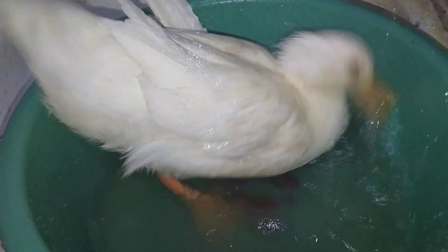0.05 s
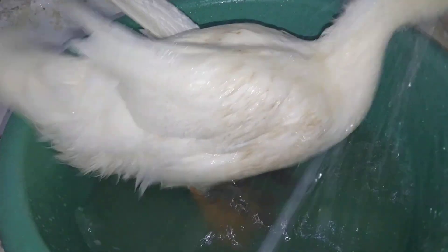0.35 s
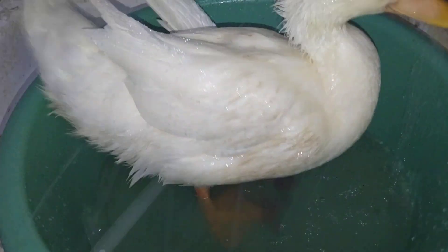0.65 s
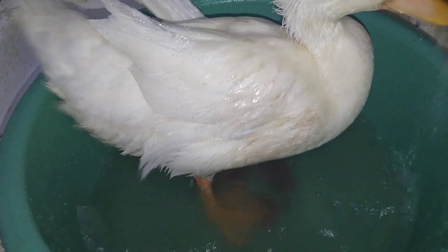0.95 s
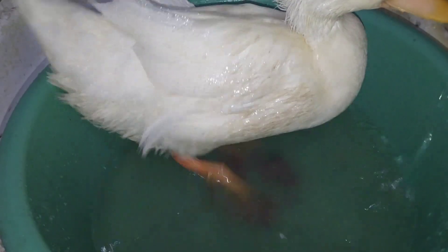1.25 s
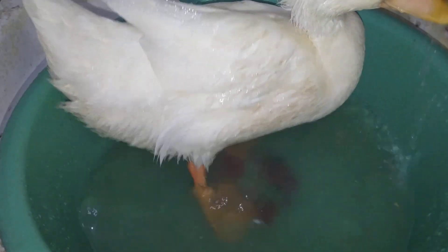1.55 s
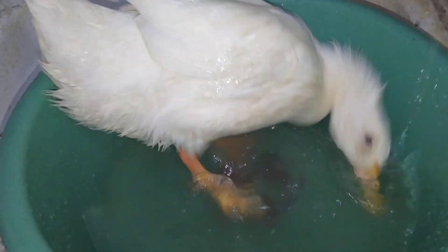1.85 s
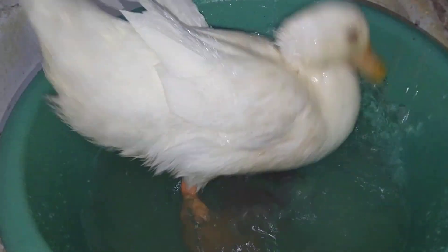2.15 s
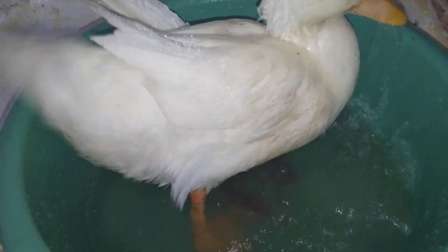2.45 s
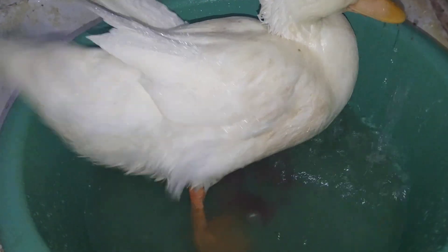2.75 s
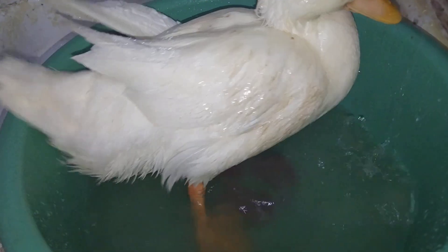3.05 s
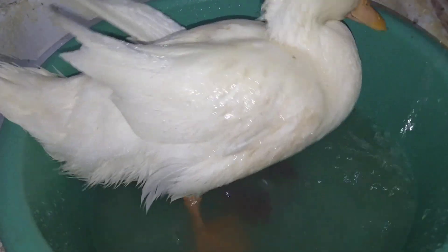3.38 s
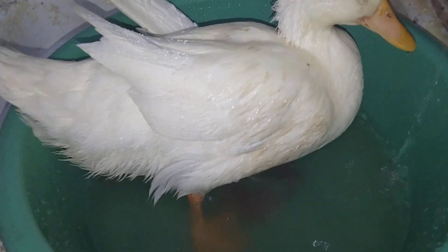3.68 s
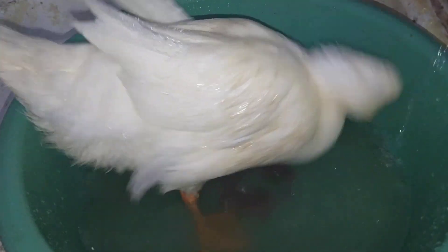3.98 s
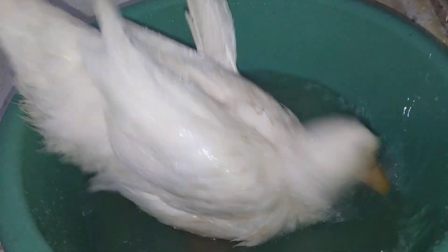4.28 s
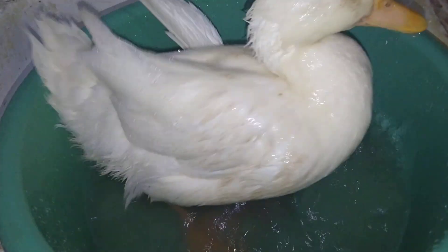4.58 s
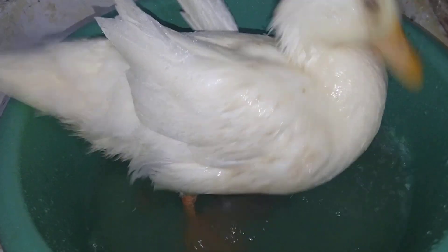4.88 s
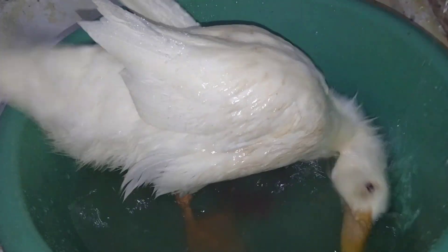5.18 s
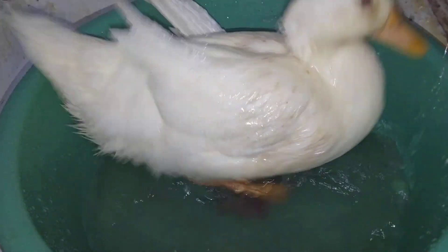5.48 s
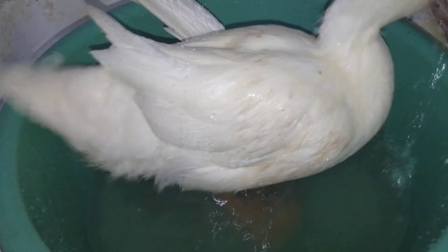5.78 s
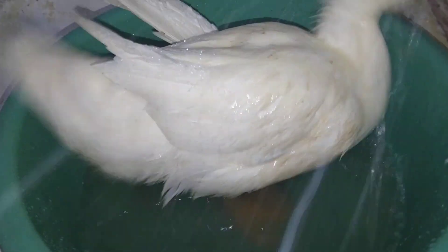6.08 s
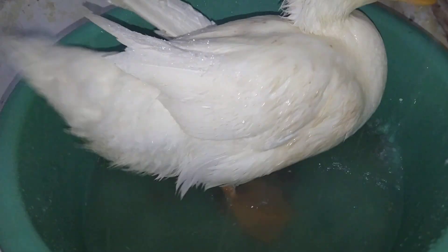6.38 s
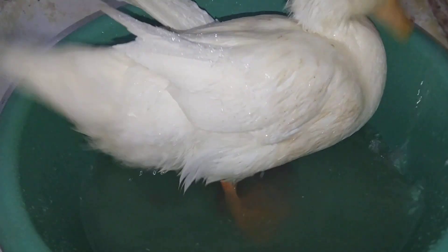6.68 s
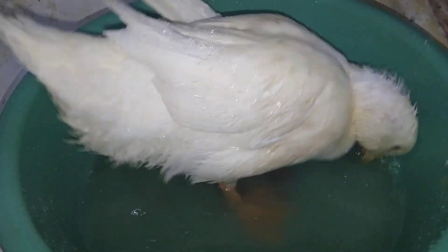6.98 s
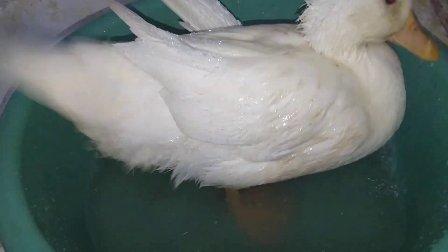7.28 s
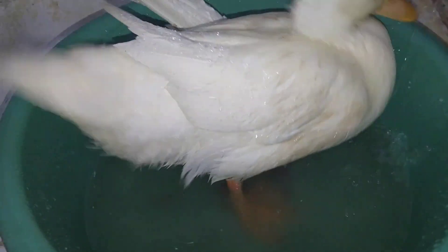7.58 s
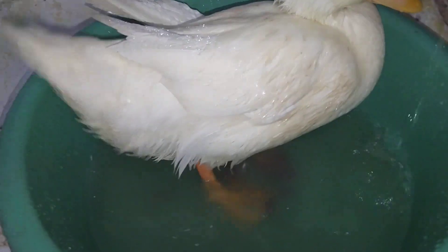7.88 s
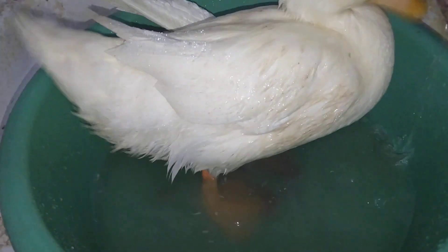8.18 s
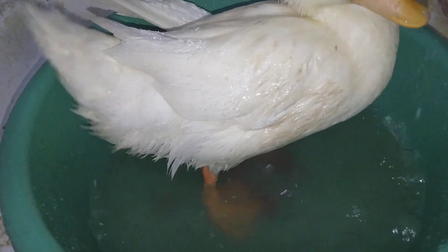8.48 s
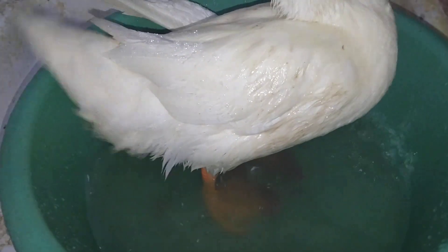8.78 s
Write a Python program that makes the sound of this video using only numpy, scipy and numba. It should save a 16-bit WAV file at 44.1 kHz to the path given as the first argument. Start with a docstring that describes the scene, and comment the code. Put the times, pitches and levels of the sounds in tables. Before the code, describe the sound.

A duck splashes about in a plastic tub, bumping its sides as an uneven stream of water slaps and bubbles.

```python
"""A stream of water falls into a plastic tub where a duck is bathing, close by in a small hard-walled room.
The stream breaks into lumps that slap and spatter; trapped air rings as bubbles and the falling water
drums on the tub. The duck steps, dips its bill and bumps the tub: sloshes, hollow gulps and knocks.
Under it all lie a low rumble and the faint hum of a far motor."""
import sys
import numpy as np
from scipy import signal
from scipy.fft import rfft, irfft
from scipy.io import wavfile
from scipy.ndimage import uniform_filter1d
from numba import njit

SR = 44100
rng = np.random.default_rng(int(sys.argv[2]) if len(sys.argv) > 2 else 0)


def store_wav(level_fs):
    """Save 16-bit WAV to argv[1]."""
    pcm = np.round(np.clip(np.atleast_2d(level_fs), -1, 1) * 32767)
    wavfile.write(sys.argv[1], SR, pcm.T.astype(np.int16))


N = 389844
TIME = np.arange(N) / SR
PORT_LAG_S = .00017  # the water lands nearer the right microphone port

# lumps of water landing: (time [s], crack [dB], splat [dB], scattered drops [dB])
LUMPS = [(0.074, -22, -20.5, -19), (0.1066, -21, -32, -26), (0.201, -10, -15, -14), (0.336, -3, -23, -37),
         (0.3725, -9.5, -22.5, -37), (0.48, -9, -20, -18.5), (0.694, -14.5, -48, -31),
         (0.7776, -8, -32, -21.5), (0.85, -6, -22.5, -21), (0.8884, -9, -18.5, -35),
         (0.9816, -9, -24, -15.5), (1.01, -5, -24, -34), (1.0238, -20, -15, -36), (1.1248, -12, -21, -40),
         (1.3568, -5.5, -18, -36), (1.372, -6.5, -32, -37), (1.4549, -14, -19.5, -42),
         (1.524, -10.5, -22, -17), (1.558, -17, -16.5, -33), (1.608, -10, -31, -19), (1.6288, -9, -22, -28),
         (1.653, -11, -25, -23), (1.669, -19, -18.5, -30), (1.752, -5.5, -28, -19), (1.773, -22, -20, -28),
         (1.82, -11, -22, -12.5), (1.87, -13, -18, -23), (1.887, -12, -33, -25), (1.904, -12, -24, -20),
         (1.9813, -2, -19, -19), (2.037, -8.5, -28, -32), (2.1117, -10.5, -16.5, -42), (2.24, -4, -16, -21),
         (2.2567, -24, -32, -32), (2.296, -10, -16, -39), (2.445, -11, -19, -34), (2.464, -20, -10.5, -39),
         (2.6407, -14, -40, -24.5), (2.719, -11, -22.5, -34), (2.815, -6, -26, -30),
         (2.862, -3, -17.5, -31), (2.9428, -10.5, -23.5, -20), (2.9845, -4.5, -13, -29),
         (2.996, -10, -32, -21), (3.054, -28, -20.5, -35), (3.117, -12.5, -17.5, -15.5),
         (3.162, -18, -20.5, -32), (3.188, -8.5, -44, -33), (3.219, -8, -20.5, -26),
         (3.285, -22, -16.5, -21), (3.3287, -9, -20, -29), (3.345, -23, -17.5, -26),
         (3.4037, -26, -24, -37), (3.448, -13, -16, -44), (3.5375, -24, -21, -18), (3.632, -10, -26, -30),
         (3.6727, -16, -20, -17), (3.7103, -6.5, -20, -30), (3.755, -8, -18, -17), (3.8135, -26, -21, -36),
         (3.8278, -3.5, -39, -37), (3.919, -6.5, -27.5, -21.5), (4.122, -3, -44, -27),
         (4.1928, -3, -15, -25), (4.334, -14, -43, -16.5), (4.364, -3, -32, -38), (4.4518, -25, -38, -19.5),
         (4.4933, -21, -33, -14), (4.5116, -21, -33, -23), (4.5751, -18, -18, -18.5),
         (4.651, -27, -22, -22), (4.7062, -10, -46, -25), (4.807, -18, -38, -17), (4.864, -8, -27, -30),
         (4.947, -9, -51, -45), (5.0222, -36, -21.5, -19.5), (5.107, -9, -19, -24), (5.15, -23, -28, -18),
         (5.22, -12, -14.5, -19), (5.3965, -11, -36, -11), (5.421, -5, -18, -33), (5.445, -17, -17, -36),
         (5.5535, -10, -43, -15), (5.5904, -8.5, -37, -24), (5.6247, -8, -29, -26), (5.656, -11, -44, -30),
         (5.7104, -9, -23, -35), (5.756, -10.5, -46, -46), (5.8698, -10.5, -26, -14),
         (5.9076, -22, -18, -23), (5.9433, -3, -20, -29), (5.9918, -8.5, -49, -31),
         (6.248, -12, -22.5, -16), (6.2557, -12, -15.5, -23), (6.292, -16, -20, -31),
         (6.348, -6, -19.5, -21), (6.403, -6.5, -22, -28), (6.432, -10, -26, -27), (6.549, -5, -38, -21.5),
         (6.6393, -21, -21.5, -20), (6.6919, -8, -16.5, -33), (6.755, -7.5, -27, -19),
         (6.8073, -3.5, -18.5, -19), (6.864, -10, -40, -32), (6.8968, -6, -24, -33), (6.95, -2, -27, -38),
         (6.9833, -8, -31, -38), (7.015, -6.5, -38, -41), (7.078, -11, -50, -19.5),
         (7.161, -11.5, -28, -25), (7.321, -10.5, -30, -15.5), (7.3882, -7, -19, -19),
         (7.4226, -0.5, -29, -37), (7.4667, -4, -24, -37), (7.521, -3, -37, -41),
         (7.6304, -15, -19.5, -19.5), (7.754, -7, -22, -31), (7.77, -4, -27, -34), (7.8, -8, -19.5, -29),
         (7.8131, -9, -25, -19), (7.87, -21, -16.5, -22), (7.8877, -7, -29, -30), (7.9126, -12, -15.5, -31),
         (7.9938, -1, -18.5, -21), (8.0118, -5.5, -22, -31), (8.064, -8, -39, -33),
         (8.0917, -24, -15.5, -38), (8.2337, -4.5, -15, -21), (8.346, -7, -18, -26),
         (8.357, -23, -17.5, -22), (8.481, -9.5, -28, -27), (8.525, -6, -12, -32), (8.545, -9, -23, -28),
         (8.732, -13, -30, -28), (8.747, -12, -11.5, -25), (8.758, -6, -34, -28), (8.817, -16, -17, -22)]
# steady fall of the stream: (time [s], spatter level [dB])
STREAM_FLOW = [(0.0, -20.5), (0.22, -22.5), (0.57, -38.5), (0.78, -49), (0.91, -26.5), (1.9, -27.5),
               (2.34, -25.5), (3.15, -25.5), (3.3, -26), (4.77, -28.5), (5.98, -32.5), (6.11, -26.5),
               (6.97, -28.5), (7.19, -42), (7.31, -45), (7.36, -27.5), (7.98, -25), (8.84, -25.5)]


def spray(spray_db, bubbling_db, flicker_db=4.0, flurry_db=1.16):
    """Droplets patter and plink, each size in its own flurries; stirred water also fizzes and tinkles."""
    # tone of the patter and of the fizz: (frequency [Hz], gain [dB])
    patter_eq = [(500, -27), (1500, 0), (3000, -31), (5000, -24), (8000, 27), (15500, -0.5)]
    fizz_eq = [(900, -10), (2000, 5.5), (3200, 10), (4500, 2), (7000, 3), (12000, -18.5)]
    # droplet sizes, coarse to fine: (lowest pitch [Hz], highest pitch [Hz], level [dB])
    drop_sizes = [(3570, 6600, -11.5), (6170, 9300, -10), (8650, 11200, -9.5), (11180, 15470, -12)]
    patter = unit(colour(droplets(rate=3000, spread_db=0.5), patter_eq))
    plinks = sum(undb(db + flicker_db * walk(rate=45))
                 * bubble_cloud(rate=700, band_hz=(low, high), cycles=90, spread_db=-1.5, glide=0.07)
                 for low, high, db in drop_sizes)
    fizz = undb(flicker_db * walk(rate=30)) * unit(colour(droplets(rate=600, spread_db=0), fizz_eq))
    # larger drops trap air and ring long enough to have a pitch
    tinkle = bubble_cloud(rate=110, band_hz=(2100, 6000), cycles=40, spread_db=4.2, glide=.05)
    # the stream lands unevenly, so drops of all sizes crowd together
    falling = undb(spray_db + flurry_db * walk(rate=99))
    stirred = undb((spray_db + bubbling_db) / 2)
    return falling * (undb(-10) * patter + plinks) + stirred * (undb(-3) * fizz + undb(-4.5) * tinkle)


def falling_water(flow_db=-1.54, scatter_db=1.05):
    """Spatter level in dB: the steady stream, plus drops that each lump throws up to fall back."""
    flow, = curves(STREAM_FLOW)
    scatter = swells([(s, 0, db) for s, _, _, db in LUMPS], attack_s=0.013, release_s=0.049)
    return 10 * np.log10(undb(flow + flow_db) ** 2 + undb(scatter_db) ** 2 * scatter) + thinning()


def thinning(deepest_db=6, lead_s=.022, full_crack_db=-8, full_splat_db=-17):
    """Dip of the spatter in dB: the stream thins just before a big lump breaks off."""
    dip = np.zeros(N)
    for s, crack, splat, _ in LUMPS:
        landing = int(s * SR)
        t = TIME[:landing][-SR // 10:]
        size = min(1, undb(max(crack - full_crack_db, splat - full_splat_db)))
        dip[landing - len(t):landing] += size * np.exp((t - s) / lead_s)
    return -deepest_db * np.minimum(dip, 1)


def slaps(crack_db=-9, splat_db=2, rise_s=.0003, burst_s=.0025, spatter_db=-24, spatter_s=.03):
    """Each lump lands as a burst of tiny cavities, never twice the same colour, with a tail of spatter."""
    # tone of the bright crack and of the wetter splat: (frequency [Hz], gain [dB])
    crack_eq = [(1000, -12), (4000, -24), (6500, 9), (15500, 9.5)]
    splat_eq = [(200, -25), (500, 7.5), (1500, 12), (3200, 1), (5500, 25), (8000, 13), (15000, -32)]
    t = np.arange(SR // 10) / SR
    window = int(.003 * SR)
    cracks = bubble_cloud(rate=5200, band_hz=(5000, 15800), cycles=2.45, spread_db=-7.5, glide=0.01)
    cracks = colour(cracks, crack_eq)
    splats = bubble_cloud(rate=1100, band_hz=(2736, 6240), cycles=15.4, spread_db=-3, glide=0.059)
    splats += undb(-3.5) * unit(colour(droplets(rate=7800, spread_db=5.5), splat_eq))
    lumps = [row[:3] for row in LUMPS] + small_lumps()
    stretches = np.exp(.2 * rng.standard_normal(len(lumps)))
    attack = 1 - np.exp(-t / rise_s)
    tail = undb(spatter_db) * np.exp(-t / spatter_s)
    out = np.zeros((2, N))
    for (s, crack, splat), stretch in zip(lumps, stretches):
        envelope = attack * (np.exp(-t / (burst_s * stretch)) + tail)
        envelope /= np.sqrt(np.mean(envelope[:window] ** 2))
        i = int(rng.random() * (N - len(t)))
        for grains, db, band_hz in ((cracks, crack + crack_db, (7500, 15000)),
                                    (splats, splat + splat_db, (2900, 6500))):
            cavities = crater(grains[:, i:i + len(t)], *band_hz)
            # the lump sets the loudness, the cavities only the colour
            power = uniform_filter1d(np.mean(cavities ** 2, axis=0), size=window)
            add(out, s, undb(db) * envelope * cavities / np.sqrt(power + 1e-9))
    return out


def small_lumps(rate=9, crack_db=4, splat_db=-2, uneven_db=3):
    """Lesser lumps land at random, as strong as the flow allows: (time [s], crack [dB], splat [dB])."""
    when, crack, splat = rng.random((400, 3))[:int(rate * N / SR)].T
    s = when * N / SR
    flow = np.interp(s, *np.transpose(STREAM_FLOW))
    cracks = flow + crack_db + uneven_db * (2 * crack - 1)
    splats = flow + splat_db + uneven_db * (2 * splat - 1)
    return list(zip(s, cracks, splats))


def crater(x, low_hz, high_hz, focus_db=7):
    """The hollow that a lump punches in the water rings at a pitch of its own."""
    hz = low_hz * (high_hz / low_hz) ** rng.random()
    return x + undb(focus_db) * signal.lfilter(*signal.iirpeak(hz, Q=7, fs=SR), x)


def sizzle(mist_db=-41):
    """Fine foam rings high in brief surges; the finest mist keeps falling even when the stream lets up."""
    # patches of foam: (start [s], length [s], level [dB])
    patches = [(2.592, 0.013, -25), (3.6, 0.022, -35), (4.665, 0.02, -28), (6.82, 0.088, -27.5),
               (7.085, 0.039, -27.5), (7.535, 0.03, -34), (8.012, .025, -25)]
    foam = bubble_cloud(rate=1500, band_hz=(8000, 10000), cycles=60, spread_db=1.5, glide=.02)
    mist = bubble_cloud(rate=2500, band_hz=(9000, 15500), cycles=45, spread_db=3, glide=.02)
    return np.sqrt(swells(patches, attack_s=0.0028, release_s=0.011)) * foam + undb(mist_db) * mist


def stirring(attack_s=0.0011, release_s=0.036):
    """Bubbling and drumming levels in dB: each slosh lifts both above the unrest of the water."""
    # water between sloshes: (time [s], bubbling [dB], drumming on the tub [dB])
    unrest = [(0.0, -41, -41), (0.29, -35, -37), (0.64, -50, -50.5), (0.88, -51, -53), (1.08, -45, -41.5),
              (2.49, -43, -45), (2.75, -55, -47), (3.13, -43, -55), (3.27, -61, -42.5), (3.99, -51, -40.5),
              (4.36, -50, -51), (4.8, -48.5, -51.5), (5.59, -36.5, -41), (6.2, -47.5, -45),
              (6.55, -39.5, -50), (7.21, -43, -44), (8.54, -47, -51), (8.84, -32.5, -46)]
    # the duck steps and dips: (start [s], length [s], level [dB], drumming relative to level [dB])
    sloshes = [(0.087, 0.027, -32, -14), (0.2, 0.14, -29.5, -10), (0.384, 0.04, -53, 14),
               (0.993, 0.14, -53.5, 16.5), (1.244, 0.12, -29.5, -5.5), (1.542, 0.044, -37, -1),
               (1.75, 0.12, -30.5, -31), (1.853, 0.12, -30.5, -4.5), (2.21, 0.043, -49, -16),
               (2.303, 0.088, -48, -19), (2.399, 0.16, -31, -11), (3.075, 0.068, -27, -13.5),
               (3.306, 0.1, -29.5, -4), (3.502, 0.016, -26, -7), (3.708, 0.061, -36.5, 1),
               (3.868, 0.3, -34, 1), (4.29, 0.066, -35, -18), (4.338, 0.055, -27.5, -15),
               (4.431, 0.1, -31, -11.5), (4.82, 0.051, -38.5, -1), (5.097, 0.023, -27, -13),
               (5.186, 0.032, -36.5, 7), (5.407, 0.053, -23.5, -7.5), (5.604, 0.077, -45, 6),
               (5.842, 0.1, -36.5, 5), (6.334, 0.33, -34, 0), (6.754, 0.22, -42, 7.5),
               (7.125, 0.032, -33, -5.5), (7.458, 0.014, -27, -5), (7.496, 0.081, -40, 7),
               (7.679, 0.13, -43, 3), (7.894, 0.072, -41.5, 3), (8.005, 0.021, -33, -4),
               (8.059, 0.038, -39, 5), (8.233, 0.37, -38.5, 3.5), (8.756, 0.041, -35.5, -0.5)]
    bubbling, drumming = curves(unrest)
    churn = swells([(s, length, db) for s, length, db, _ in sloshes], attack_s, release_s)
    wash = swells([(s, length, db + share) for s, length, db, share in sloshes], attack_s, release_s)
    return (10 * np.log10(undb(bubbling) ** 2 + undb(-4) ** 2 * churn),
            10 * np.log10(undb(drumming + 1) ** 2 + undb(-2) ** 2 * wash))


def gurgle(bubbling_db, drumming_db):
    """Stirred water bubbles all the time and glugs where it is churned deep."""
    cloud = bubble_cloud(rate=1400, band_hz=(760, 3200), cycles=7.5, spread_db=5.5)
    glugs = bubble_cloud(rate=110, band_hz=(366.7, 712), cycles=23.7, spread_db=3)
    return undb(bubbling_db - 3) * cloud + undb(drumming_db - 6) * glugs


def plops(plop_db=1, cycles=21, glide=0.053, shed_count=4, shed_db=-13, shed_s=.018, shed_octaves=0.23):
    """A large bubble plops and sheds a few smaller and larger ones, which roughen its note."""
    # single large bubbles: (time [s], level [dB], pitch [Hz])
    large_bubbles = [(0.202, -3.5, 2340), (0.291, -10, 1070), (0.41, -22, 590), (0.685, -17, 2300),
                     (1.025, -7, 3320), (1.754, -1, 2900), (1.914, -11.5, 1540), (2.215, -14, 1590),
                     (2.298, -15, 1590), (2.4614, 1, 3160), (3.078, -14, 1370), (3.132, -29, 820),
                     (3.508, -18, 1250), (3.675, -20.5, 1210), (4.258, -13.5, 1840), (4.41, -20, 774),
                     (4.498, -28, 266), (4.839, -9.5, 1670), (5.608, -17, 830), (6.348, -7.5, 2300),
                     (6.626, -18.5, 1030), (6.782, -14.5, 820), (7.015, -16.5, 1800), (7.109, -8, 2180),
                     (7.19, -19.5, 820), (7.422, -10.5, 1680), (7.572, -10.5, 1540), (7.6897, 5, 2970),
                     (8.2229, -7, 3450), (8.459, -0.5, 2620), (8.789, -6.5, 2420), (8.818, 3, 3500)]
    s, db, hz = np.array(large_bubbles, float).T
    each = np.ones(len(s))
    out = bubbles(s, hz, cycles * each, undb(db + plop_db), glide * each, PORT_LAG_S / 2 * each)
    for late, pitch, place in rng.random((len(s), shed_count, 3)).transpose(1, 2, 0):
        shed_hz = hz * 2 ** (shed_octaves * (2 * pitch - 1))
        out += bubbles(s + shed_s * late, shed_hz, cycles / 2 * each,
                       undb(db + shed_db), glide * each, 2 * PORT_LAG_S * place)
    return out


def gulps(gulp_db=-1, glide=0.041, roughness=0.4):
    """Deep air pockets ring hollow and long, wobbling roughly and rising a little as they come up."""
    # air pushed under by the duck: (time [s], level [dB], pitch [Hz], t60 [s])
    air_pockets = [(1.053, -25, 492, .2), (1.99, -24, 283, .11), (2.04, -29, 245, 0.14),
                   (3.163, -23, 481, 0.12), (3.193, -21, 520, 0.25), (3.312, -12, 494, 0.14),
                   (3.314, -18.5, 235.6, 0.3), (3.334, -17, 423, 0.19), (3.972, -25, 470, 0.22),
                   (6.407, -21, 408, 0.19), (6.426, -32.5, 324, 0.63), (6.625, -28, 409, 0.28),
                   (6.886, -19, 498, 0.16), (8.258, -30, 483, 0.2), (8.325, -25, 398, .2),
                   (8.428, -20, 398, 0.24)]
    s, db, hz, t60 = np.array(air_pockets, float).T
    each = np.ones(len(s))
    wobble = 1 + roughness * walk(rate=170)
    return wobble * bubbles(s, hz, t60 * hz, undb(db + gulp_db), glide * each, PORT_LAG_S * each)


def tub_drum(drumming_db):
    """Falling water drums on the tub; it rocks to and fro, so the ring keeps shifting."""
    drop_eq = [(100, -1), (240, -3), (430, -0.5), (600, 2.5), (900, 4), (2000, -10)]
    drops = colour(droplets(rate=260, spread_db=5, lag_spread_s=0)[1], drop_eq)
    rock = 2 * walk(rate=2)
    drum = ring(drops * np.cos(rock), tub_response()) + ring(drops * np.sin(rock), tub_response())
    return undb(drumming_db - 2) * unit(drum)


def tub_knocks(contact=30, push_s=0.007, wash_db=-17, wash_s=0.11, smack_db=-3, smack_s=0.0032):
    """Heavy splashes and bumps ring the tub, the harder the brighter."""
    # blows against the tub: (time [s], level [dB], hardness [dB per octave])
    blows = [(0.152, -25.5, 11.5), (0.201, -27.5, 9), (0.387, -35.5, 2), (0.889, -32, 12.5),
             (1.007, -29.5, 10), (1.259, -32, 10), (1.99, -35, -7.5), (2.299, -29, 8), (3.163, -27.5, 1.5),
             (3.309, -16.5, 3), (3.964, -26, 5), (4.199, -28, 8), (4.497, -34, 1), (5.102, -18, 8.5),
             (5.396, -21.5, 8.5), (5.606, -34.5, 14), (5.658, -35, 6.5), (6.338, -31, 13),
             (6.405, -26.5, -0.5), (6.548, -27, 4.5), (6.781, -24.5, -0.5), (6.885, -24, 16),
             (8.255, -31, 3), (8.314, -29, -1), (8.429, -24.5, 1)]
    smack_eq = [(150, -15), (800, 1), (4000, -13.5)]
    t = np.arange(SR // 2) / SR
    out = np.zeros((2, N))
    for s, db, hardness in blows:
        # a sharp first contact, a rough push, then water washing back against the wall
        push = rng.standard_normal(len(t)) * (np.exp(-t / push_s) + undb(wash_db) * np.exp(-t / wash_s))
        push[0] += contact
        push = colour(push, [(220, 0), (880, 2 * hardness), (3000, 2 * hardness - 4)])
        knock = ring(push, tub_response())
        peak_power = uniform_filter1d(np.mean(knock ** 2, axis=0), size=SR // 50).max()
        # the blow also smacks the water's surface, heard before the tub swings up
        smack = unit(colour(rng.standard_normal(len(t)), smack_eq)) * np.exp(-t / smack_s)
        add(out, s, undb(db) * (knock / np.sqrt(peak_power) + undb(smack_db + hardness / 2) * smack))
    return out


def tub_response(detune=.015, port_phase_rad=0.2, clack_db=3, clack_s=0.005):
    """The tub's modes, detuned by the shifting water, and the short clack of its wall."""
    # modes of the plastic tub: (frequency [Hz], level [dB], t60 [s])
    modes = [(147, -17.5, 0.36), (212.3, -9, 0.2), (235.3, -6.5, 0.34), (324.3, -6.5, 0.18),
             (384.7, -7, 0.42), (430.2, -0.5, 0.38), (461, 6.5, 0.055), (516, 6, 0.095),
             (578.5, -7.5, 0.28), (777.5, -4, 0.11), (836.6, -2, 0.066), (1006, -10, 0.12),
             (1200, -14, 0.058)]
    clack_eq = [(50, -70), (150, -49), (500, -3.5), (1400, -1), (3000, 2), (8000, -50)]
    t = np.arange(SR // 2) / SR
    water_load = 1 + detune * rng.standard_normal(len(modes))
    body = np.zeros((2, len(t)))
    for k, (hz, db, t60) in enumerate(modes):
        polarity = (-1) ** k
        phase = 2 * np.pi * hz * water_load[k] * t + port_phase_rad * polarity * np.array([[1], [-1]])
        body += polarity * undb(db) * np.exp(-np.log(1000) * t / t60) * np.sin(phase)
    clack = unit(colour(rng.standard_normal((2, len(t))), clack_eq))
    return body + undb(clack_db) * clack * np.exp(-t / clack_s)


def room(x, wet_db=-7.5, t60=0.17, near_db=-5, wall_s=0.013, crossfade_hz=0.4487):
    """Things nearby answer each splash faintly, then the walls with a short tail."""
    echo_eq = [(200, -4.5), (600, -6), (1500, 7.5), (5000, 1.5), (15000, 2)]
    t = np.arange(SR // 2) / SR
    build_up = np.where(t > wall_s, 1, undb(near_db) * np.sqrt(t / wall_s))
    envelope = build_up * np.exp(-np.log(1000) * t / t60)
    # two echo tails slowly crossfade, so the room's colour keeps shifting
    angle = 2 * np.pi * crossfade_hz * TIME
    out = x
    for crossfade in (np.cos(angle), np.sin(angle)):
        tail = rng.standard_normal((2, len(t))) * envelope
        tail /= np.sqrt(np.sum(tail ** 2, axis=1, keepdims=True))
        out = out + undb(wet_db) * crossfade * ring(x, colour(tail, echo_eq))
    return out


def rumble(level_db=-60.5, width=0.16):
    """A bed of low noise, nearly alike at both ports."""
    # tone of the rumble: (frequency [Hz], gain [dB])
    rumble_eq = [(20, -56), (35, -31), (60, 6.5), (80, 3), (105, -34), (150, 8), (200, -3), (400, -5),
                 (1500, -28)]
    noise = rng.standard_normal(N) + width * rng.standard_normal((2, N))
    return undb(level_db) * unit(colour(noise, rumble_eq))


def far_motor(waver_db=4.5, drift=0.02):
    """A far motor hums one low tone that swells and wavers."""
    # course of the hum: (time [s], level [dB], pitch [Hz])
    hum = [(0, -65, 82), (1.5, -55.5, 86), (2.8, -79, 85), (3.5, -58, 89), (4.4, -45.5, 88), (4.7, -66, 81),
           (6.1, -63, 85), (8.8, -67, 82)]
    hum_db, hum_hz = curves(hum)
    phase = 2 * np.pi * np.cumsum(hum_hz * (1 + drift * walk(rate=11))) / SR
    return undb(hum_db + waver_db * walk(rate=9.1)) * np.sin(phase)


def droplets(rate, spread_db, lag_spread_s=.00012):
    """Random clicks of unequal size, rate a second; each reaches the left port with its own lag."""
    when, weight, polarity, place = rng.random((120000, 4))[:int(rate * N / SR)].T
    at = (when * N).astype(int)
    size = undb(-spread_db * np.log(0.0041 + weight)) * np.sign(polarity - .5)
    lag = np.round((PORT_LAG_S + lag_spread_s * (2 * place - 1)) * SR).astype(int)
    return np.array([np.bincount((at + lag) % N, size, N), np.bincount(at, size, N)])


@njit
def bubbles(s, hz, cycles, gain, glide, lag_s):
    """Damped tones that rise as each bubble nears the surface; cycles counts the ring down to -60 dB."""
    out = np.zeros((2, N))
    for k in range(len(s)):
        life = cycles[k] / hz[k]
        for channel in range(2):
            start = int((s[k] + lag_s[k] * (1 - channel)) * SR)
            for i in range(max(0, -start), min(int(life * SR), N - start)):
                t = i / SR
                envelope = (1 - np.exp(-t * hz[k] * 1.5)) * np.exp(-6.9 * t / life)
                phase = 2 * np.pi * hz[k] * t * (1 + glide[k] * t / life)
                out[channel, start + i] += gain[k] * envelope * np.sin(phase)
    return out


def bubble_cloud(rate, band_hz, cycles, spread_db, glide=0.25):
    """Bubbles of mixed sizes ring at random, rate a second; rms 1."""
    when, pitch, life, size, rise, place = rng.random((40000, 6))[:int(rate * N / SR)].T
    low_hz, high_hz = band_hz
    hz = low_hz * (high_hz / low_hz) ** pitch
    gain = undb(-spread_db * np.log(.03 + size))
    lag_s = PORT_LAG_S * (3 * place - .5)
    return unit(bubbles(when * N / SR, hz, cycles * (0.95 + life), gain, 2 * glide * rise, lag_s))


def swells(events, attack_s, release_s):
    """Power of overlapping events that rise, hold and die away: (start [s], length [s], level [dB])."""
    power = np.zeros(N)
    for s, length, db in events:
        i = int(s * SR)
        t = TIME[:min(int((length + .5) * SR), N - i)]
        envelope = (1 - np.exp(-t / attack_s)) * np.exp(-np.maximum(t - length, 0) / release_s)
        power[i:i + len(t)] += (undb(db) * envelope) ** 2
    return power


def walk(rate):
    """Smooth random wandering, spread near 1, with rate steps a second."""
    steps = rng.standard_normal(2000)
    return 1.21 * np.interp(TIME * rate, np.arange(len(steps)), steps)


def curves(table):
    """Each column after the time as a value per sample."""
    s, *columns = np.transpose(table)
    return [np.interp(TIME, s, column) for column in columns]


def colour(x, eq, size=4096):
    """Minimum-phase EQ through points of (frequency [Hz], gain [dB])."""
    hz, db = np.transpose(eq)
    bin_hz = np.arange(size // 2 + 1) * SR / size
    gain = undb(np.interp(np.log(bin_hz + 1), np.log(hz), db))
    cepstrum = irfft(np.log(gain))
    cepstrum[1:size // 2] *= 2
    cepstrum[size // 2 + 1:] = 0
    return ring(x, irfft(np.exp(rfft(cepstrum))))


def ring(x, response):
    """Pass a sound through an impulse response."""
    y = signal.oaconvolve(np.atleast_2d(x), np.atleast_2d(response), axes=1)
    return y[:, :np.shape(x)[-1]]


def add(out, s, x):
    """Mix a two-channel sound in at time s."""
    i = int(np.clip(s * SR, 0, N - 1))
    out[:, i:i + x.shape[1]] += x[:, :N - i]


def undb(db):
    """Decibels to gain."""
    return 10 ** (np.asarray(db) / 20)


def unit(x):
    """Scale to rms 1."""
    return x / np.sqrt(np.mean(x ** 2) + 1e-18)


def scene():
    """Water and tub sound in the room, over the rumble and the motor."""
    bubbling_db, drumming_db = stirring()
    splashing = spray(falling_water(), bubbling_db) + sizzle() + slaps()
    trapped_air = gurgle(bubbling_db, drumming_db) + plops() + gulps()
    tub = tub_drum(drumming_db) + tub_knocks()
    return room(splashing + trapped_air + tub) + rumble() + far_motor()


def record(dry, ceiling=.8, low_cut_hz=46, high_cut_hz=15600):
    """The left port is muffled, the right rings in the treble; peaks are rounded, lows and highs cut."""
    # response of the two microphone ports: (frequency [Hz], gain [dB])
    left_eq = [(60, 5.5), (450, 0.5), (1300, -2), (3200, -5), (5500, -3.5), (7000, -4.5), (9000, -16.5),
               (15000, -11.5)]
    right_eq = [(60, 2.5), (700, -5), (1400, -3.5), (2700, -6), (6000, -2), (7800, 1), (9250, 5),
                (11000, 1), (12500, 1.5), (14500, 5.5)]
    ports = np.vstack([colour(dry[0], left_eq), colour(dry[1], right_eq)])
    ports = ceiling * np.tanh(ports / ceiling)
    ports = signal.sosfilt(signal.butter(3, low_cut_hz, "high", fs=SR, output="sos"), ports)
    return signal.sosfilt(signal.ellip(10, .2, 80, high_cut_hz, fs=SR, output="sos"), ports)


dry = scene()
out = record(dry)
store_wav(out)
```